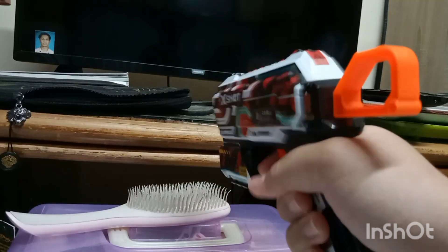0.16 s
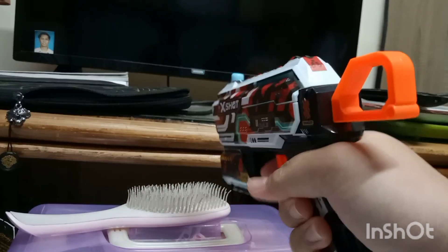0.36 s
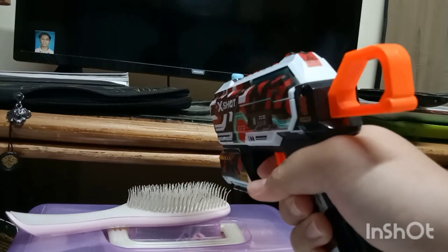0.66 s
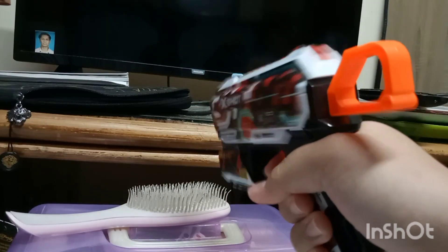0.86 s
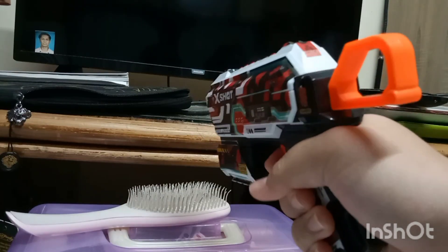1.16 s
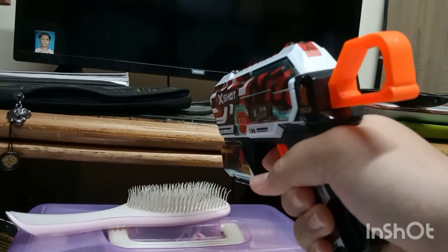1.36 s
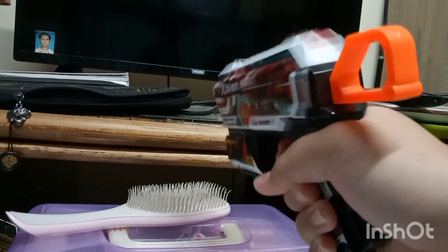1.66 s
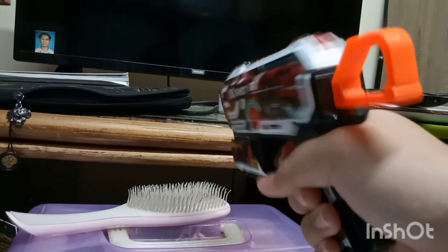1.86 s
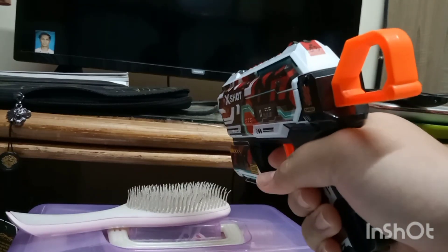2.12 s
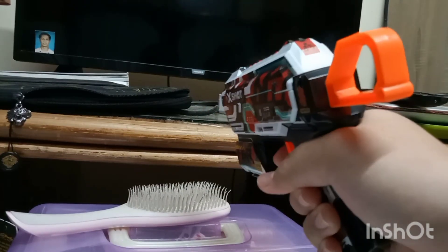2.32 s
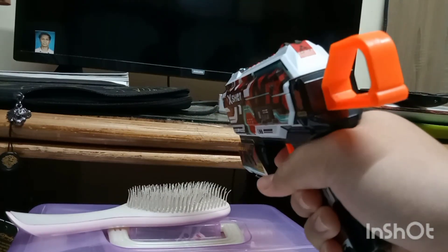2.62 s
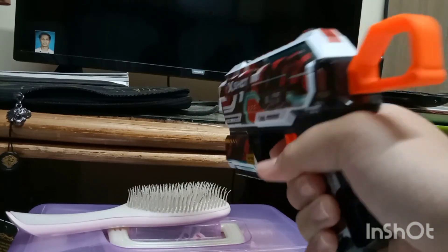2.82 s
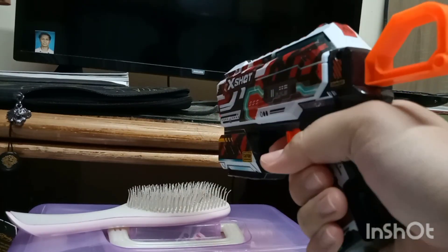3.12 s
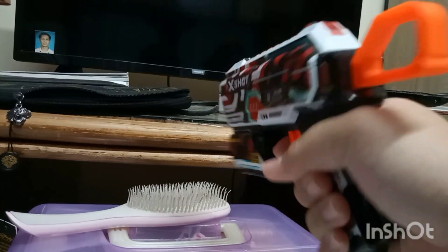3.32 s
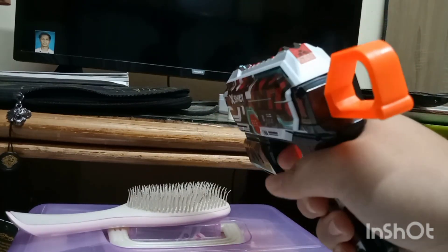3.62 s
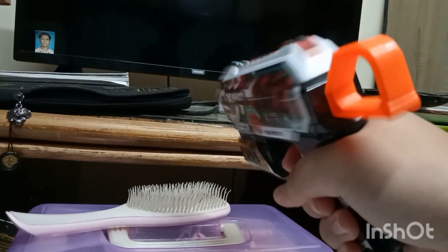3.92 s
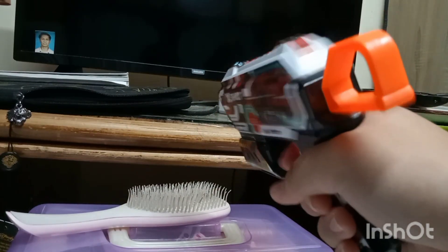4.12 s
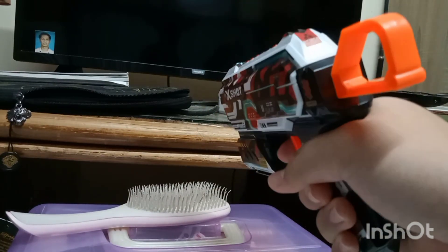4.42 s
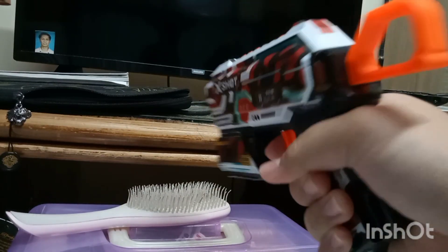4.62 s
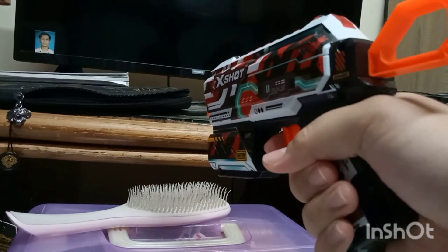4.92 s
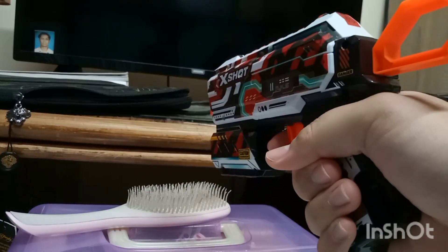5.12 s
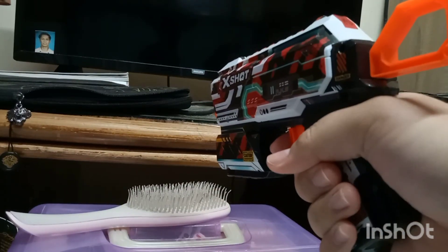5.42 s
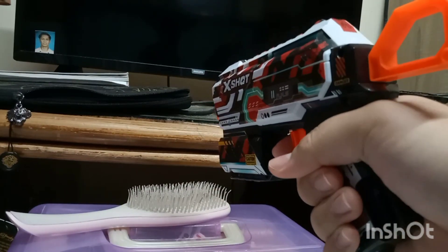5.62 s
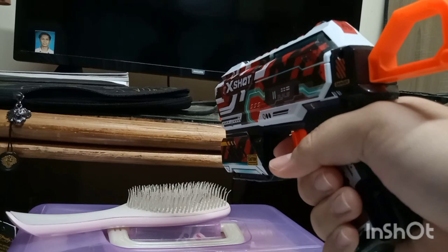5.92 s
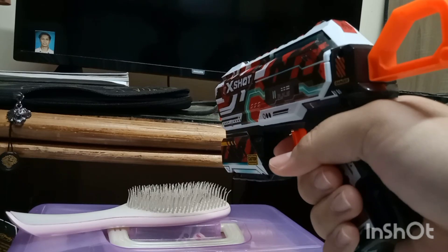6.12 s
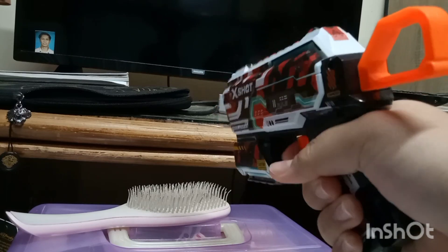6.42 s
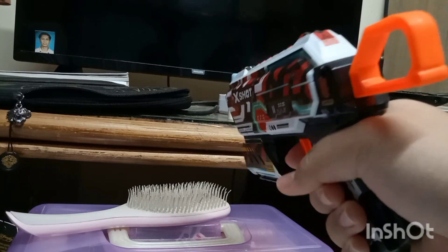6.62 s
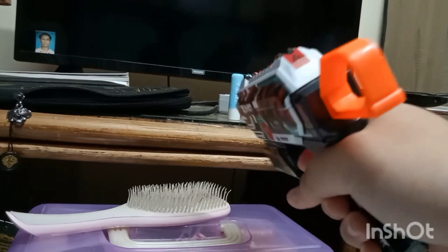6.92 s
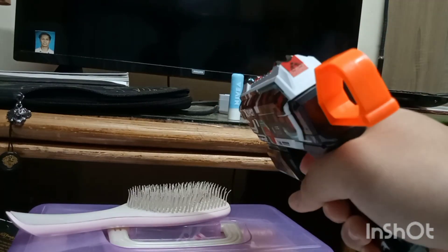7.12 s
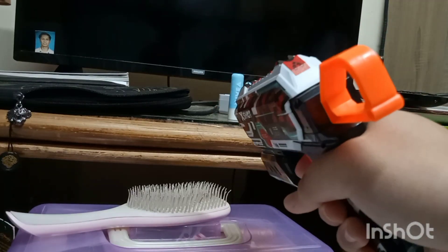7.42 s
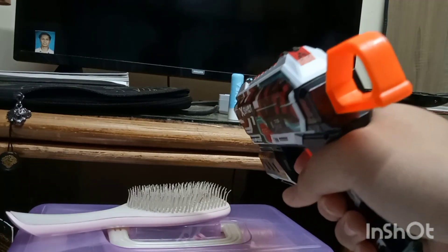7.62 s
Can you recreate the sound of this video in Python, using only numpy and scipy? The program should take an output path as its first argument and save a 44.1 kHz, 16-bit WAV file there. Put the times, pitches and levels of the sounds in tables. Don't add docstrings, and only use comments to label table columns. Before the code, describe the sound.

A hand works a hollow plastic toy blaster very close to a phone microphone in a small room. Six pulls come in pairs over the first two seconds, then a pause, four rapid pulls, a longer pause and one last pull. Each scrapes, clicks and slams, then the slide rubs back with ticks and a knock. Faint hum lies underneath.

```python
import sys
import numpy as np
from scipy import signal
from scipy.fft import rfft, irfft
from scipy.io import wavfile
from scipy.ndimage import uniform_filter1d

SR = 44100
rng = np.random.default_rng(int(sys.argv[2]) if len(sys.argv) > 2 else 0)


def put_to_file(sound):
    columns = np.atleast_2d(sound).T
    safe = np.clip(columns, -1, 1)
    whole_steps = np.round(safe * 32767)
    wavfile.write(sys.argv[1], SR, whole_steps.astype(np.int16))


def natural_amplitude(level_db):
    exponent = np.asarray(level_db, float) / 20
    return 10 ** exponent


N = 342216
LEAD = 4410

# frequency in Hz, level in dB per Hz.
WASH = [(15, -59), (30, -42), (60, -41), (87, -18.5), (124, -29.5), (182, -23.5), (252, -13.5), (290, -18),
        (600, -22), (750, -17.5), (1300, -19), (1700, -25.5), (1900, -38.5), (3400, -40), (4400, -46.5),
        (5270, -40), (6200, -47.5), (9000, -56), (16500, -55.5)]
# time in seconds, level in dB.
DRIFT = [(0, 0), (2.4, -0.5), (3.2, -1.5), (4.8, -1.5), (5.7, 2), (6.9, 0.5), (7.76, 4)]
# opening, sagging and shutting in seconds, lift in dB.
FLURRIES = [
    (-.5, 0.033, 0.69, 13.5),
    (0.215, 0.691, .76, 14.5),
    (0.901, 1.455, 1.8, 13),
    (1.7, 2.272, 2.29, 9),
    (3.524, 4.489, 4.67, 12),
    (6.352, 6.658, 6.7, 12.5),
]

# frequency in Hz, t60 in seconds.
ROOM = [(400, 0.23), (1000, 0.16), (2800, 0.15), (6000, .16), (9000, 0.145), (14000, 0.17)]
# delay in seconds, level in dB.
ECHOES = [(0.0126, -17), (0.0205, -24)]

# time in seconds, peak in dB, ring in Hz, room tail in dB.
FIDGETS = [
    (0.853, -52, 3710, -6),
    (4.468, -46, 3010, -8),
    (4.5265, -50, 3420, -9.5),
    (4.5978, -65, 2900, -9),
    (4.6218, -57, 3666, -13.5),
    (6.727, -67, 3200, -2),
    (0.877, -53.5, 5793, -2),
    (4.712, -72.5, 3300, -6.5),
]
# time in seconds, peak in dB, ring in Hz, room tail in dB.
PINCHES = [
    (1.517, -51, 6385, -10.5),
    (4.6205, -52.5, 6960, -9.5),
]
# frequency in Hz, level in dB per Hz.
FIDGET_COLOUR = [(470, -37.5), (800, -15.5), (1110, -2), (2350, -10.5), (3690, -4.5), (5300, -13),
                 (6890, -4.5), (7800, -17.5), (12000, -35.5), (15600, -63.5), (22000, -120)]
# frequency in Hz, level in dB per Hz.
PINCH_COLOUR = [(470, -43), (1100, -17), (2500, -25), (3700, -3), (5500, -27), (6600, 2), (7800, -3),
                (8500, -28), (16000, -54)]

# frequency in Hz, level in dB per Hz.
JOLT_COLOUR = [(15, -4.5), (40, -3.5), (100, 0), (160, 0.5), (230, -13), (400, -40)]
# start in seconds, pitch and width in Hz,
# level in dB, t60 in seconds.
LINGERING_TONES = [(0.072, 3142, 60.1, -71, 1.3), (0.771, 3200, 90.5, -74, .3), (1.125, 3700, 58.85, -23, .12),
                   (1.45, 3500, 400, -56, .36), (1.47, 1050, 150.7, -53.5, .25), (1.5, 1650, 200, -67.5, .3),
                   (4.715, 1450, 110, -64, .3), (4.515, 1500, 60, -60, .12), (6.405, 1335, 50, -21, .17),
                   (3.815, 1330, 30, -23, .2), (1.232, 1340, 40, -24, .14), (4.255, 1325, 50, -25, .15),
                   (0.855, 1080, 60, -57, .3), (4.63, 3200, 300, -78, .4), (0.09, 1620, 50, -72, .5),
                   (0.16, 1650, 50, -74, .5), (0.78, 1920, 60, -74, .4), (1.6, 1250, 200, -66, .3),
                   (1.655, 1600, 60, -66, .2), (1.53, 5300, 80, -68, .12), (4.6, 1200, 400, -64, .25),
                   (3.245, 900, 80, -67, .15), (6.73, 4700, 300, -74, .2)]
# frequency in Hz, level in dB, t60 in seconds.
RATTLE = [(567.5, -30, 0.11), (675, -35, 0.18), (785, -24.5, 0.16), (872, -26.5, 0.22), (950, -22, 0.17),
          (1006, -25, 0.17), (1079, -25, .15), (1182, -25, 0.15), (1216, -27.5, 0.2), (1286, -28, 0.13),
          (1312, -23, 0.18), (1412, -26.5, 0.18), (1694, -29.5, .18), (1714, -25, .16),
          (1806, -35, .12), (1930, -36, .09), (2018, -33, .1), (2590, -35, .06), (3050, -35, .06),
          (3200, -37, .07), (3520, -37, .05), (3737, -38, .07)]
# end and length in seconds, start and slowest level in dB.
RUBS = [(0.413, 0.063, -24.5, -40.5), (0.629, 0.061, -26.5, -33.5), (1.103, 0.072, -26.5, -46),
        (1.346, 0.061, -28.5, -44), (1.873, 0.036, -31.5, -38), (2.087, 0.057, -28, -32.5),
        (3.689, 0.045, -30, -42), (3.91, .051, -29.5, -32.5), (4.143, 0.052, -27, -41),
        (4.358, .047, -28, -34.5), (6.537, 0.078, -28, -45)]

# time in seconds, peak in dB, ring in Hz, room tail in dB under the knock.
TICKS = [(0.397, -19.5, 3100, -13.5), (0.4118, -7, 6147, -13.5), (0.633, -5, 5350, -12.5),
         (1.0877, -20.5, 3428, -8), (1.1049, -5.5, 5780, -13), (1.3327, -17.5, 6153, -12.5),
         (1.3454, -7, 6270, -8.5), (1.8561, -14.5, 3298, -13), (1.8709, -6.5, 5850, -9),
         (2.0758, -16, 2855, -15.5), (2.0905, -4.5, 5348, -9), (3.692, -13, 5478, -6.5),
         (3.708, -2, 5837, -6), (3.913, -4.5, 5476, -7.5), (4.13, -17, 3146, -8), (4.145, -6.5, 5735, -7),
         (4.361, -6.5, 5552, -3.5), (6.5171, -25, 3062, -24.5), (6.5365, -7, 3030, -7)]
# time in seconds, peak in dB, ring in Hz, room tail in dB.
GRAZES = [
    (0.629, -13, 5400, -12),
    (1.103, -14, 3518, -11.5),
    (2.0892, -11, 5267, -12.5),
    (3.705, -17.5, 3004, -9),
    (4.358, -10, 5786, -12.5),
    (6.5335, -12.5, 3029, -12),
    (1.883, -5, 5958, -20),
]
# time in seconds, peak in dB, ring in Hz, room tail in dB.
RETURNS = [(0.427, -1.5, 5700, -6), (0.648, 1.5, 5304, -10), (1.123, -1.5, 3640, -7.5),
           (1.363, 0.5, 6130, -9.5), (1.8862, 0, 6355, -9.5), (2.104, 0, 5688, -9.5),
           (3.7227, -2.5, 2530, -8), (3.927, -2, 5483, -7), (4.160, -3, 5640, -6.5), (4.375, -1, 5550, -8),
           (6.559, -1, 5660, -10)]
# time in seconds, peak in dB, ring in Hz, room tail in dB.
EARLIER = [
    (-0.024, -4.5, 3700, -6.5),
]
# frequency in Hz, level in dB per Hz.
TICK_COLOUR = [(180, -56.5), (300, -53.5), (650, -25), (1000, 2.5), (1660, -12), (2170, -3.5), (2890, -1.5),
               (4170, -6), (5370, 2), (11000, -14.5), (14900, -11), (15700, -19), (16500, -40)]
# frequency in Hz, level in dB per Hz.
RETURN_COLOUR = [(180, -55), (300, -41.5), (620, -20), (954, -2.5), (2840, -7.5), (4460, -7), (5370, -2),
                 (6240, -3), (6900, -6.5), (9650, -14.5), (11000, -18), (15400, -18.5), (15900, -50)]

# time in seconds, peak in dB, ring in Hz, room tail in dB.
CATCHES = [(0.235, -15, 4965, -7), (0.469, 0, 5272, -26), (0.901, -11, 3146, -10),
           (1.177, -3.5, 3200, -18.5), (1.706, -5.5, 6240, -16.5), (1.938, -6, 6300, -16),
           (3.535, -7, 5460, -13.5), (3.756, -4, 5402, -26.5), (3.98, -2, 5140, -14),
           (4.196, -3.5, 4837, -44.5), (6.35, -7.5, 3383, -16.5)]
# time in seconds, peak in dB, ring in Hz, room tail in dB.
SCRAPES = [
    (0.462, -16, 5190, -31.5),
    (1.170, -11.5, 1037, -23.5),
    (1.699, -17, 5130, -25),
    (1.934, -14, 5487, -24),
    (3.750, -11, 3213, -25.5),
    (3.974, -12.5, 5160, -26),
    (4.190, -14.5, 5100, -30.5),
]
# time in seconds, peak in dB, ring in Hz, room tail in dB.
SNAPS = [
    (0.2355, -15.5, 4835, -29.5),
    (1.179, -7, 3200, -29),
    (1.9385, 0, 6332, -31),
    (3.757, -5.5, 3140, -30),
]
# time in seconds, peak in dB, ring in Hz, room tail in dB.
NUDGES = [(0.26, -31, 959, -4), (0.491, -22.5, 1107, -1.5), (0.933, -24, 989, -6.5), (1.194, -22.5, 952, 1),
          (1.727, -30.5, 1367, 4.5), (1.956, -25, 973.4, 2), (3.556, -20.5, 1006, -1.5),
          (3.779, -20, 922.4, -3.5), (3.999, -15.5, 954, -11), (4.216, -20, 970, -1),
          (6.367, -26, 940.5, 0)]
# time in seconds, peak in dB, ring in Hz, room tail in dB.
LATCHES = [(0.2815, -3.5, 6018, -13), (0.5027, -1, 5980, -13), (0.9571, 0.4, 3197, -11.5),
           (1.2066, -1.7, 5950, -13.5), (1.7438, -2, 5887, -14), (1.9678, -0.5, 5923, -14.5),
           (3.5684, -2.5, 3516, -14), (3.7898, -4.5, 3546, -16), (4.0148, 2, 3526, -19.5),
           (4.2298, -4.5, 5834, -17), (6.3809, -0.06, 6080, -15)]
# time in seconds, peak in dB, ring in Hz, room tail in dB.
SLAMS = [(0.299, -1.95, 1070, -3), (0.522, -1.3, 1005, -3.5), (0.975, -2.25, 1037, -4),
         (1.227, 0.45, 1071, -7.5), (1.763, -0.23, 1020, -5), (1.987, -4, 979.6, -3),
         (3.588, -0.5, 1019, -7.5), (3.809, 0.44, 1059, -6), (4.033, -3, 1144, -4.5),
         (4.2489, -0.5, 1208, -8), (6.401, -0.2, 1172, -7.5)]
# frequency in Hz, level in dB per Hz.
CATCH_COLOUR = [(180, -57.5), (300, -39.5), (620, -27), (880, -3), (1690, -5.5), (2890, 2), (4170, -1),
                (6340, 5.5), (8870, -6.5), (9810, -7), (11400, -14.5), (15200, -9), (16500, -27.5)]
# frequency in Hz, level in dB per Hz.
NUDGE_COLOUR = [(180, -58), (500, -32.5), (800, -2), (1100, 1.5), (1500, -4), (3000, -31), (6000, -29.5),
                (16500, -55)]
# frequency in Hz, level in dB per Hz.
LATCH_COLOUR = [(180, -64.5), (300, -41.5), (1020, -16), (2700, -14.5), (3530, -5.5), (4460, -13),
                (5930, 0), (6900, -15), (9980, -17), (11200, -24.5), (14900, -24.5), (16500, -29)]
# frequency in Hz, level in dB per Hz.
SLAM_COLOUR = [(180, -57.5), (330, -38), (600, -23), (800, -7.5), (1130, -6), (2000, -5.5), (2900, -4.5),
               (4000, -9), (6100, -0.5), (7200, -12.5), (9500, -13.5), (12000, -25), (15400, -24),
               (15900, -50)]
# frequency in Hz, level in dB per Hz.
SLAM_TAIL = [(180, -68.5), (330, -44.5), (560, -17.5), (760, -17), (920, -8.5), (1050, -9), (1350, -7),
             (1520, -10), (2300, -16), (2800, -16.5), (4030, -18), (5900, -13.5), (8500, -23.5),
             (16500, -31.5)]
# frequency in Hz, level in dB, t60 in seconds.
SHELL = [(884, -8, 0.16), (1020, 8.5, .024), (1125.4, 0, 0.052), (1244, -10.5, 0.67)]
# frequency in Hz, level in dB, t60 in seconds.
WALLS = [(1060, -6, .025), (2050, -9, .016), (2350, -8, .014), (3120, -6, .016), (3720, -7, .016),
         (4900, -6, .014), (5500, -2, .014), (6200, -3, .014)]

# frequency in Hz, gain in dB.
MICROPHONE = [(300, -0.5), (600, -0.06), (1500, -2), (3000, 2.5), (4000, 0.5), (6350, 1), (6650, -4),
              (7700, -1.5), (8000, 0.36), (10650, 0.45), (10950, -5.5), (13500, -4), (15500, 3),
              (15850, -9), (16650, -14), (16950, -70)]
# lower and upper edge in Hz, spread in dB.
PATCHY = [(1800, 3300, 1.5), (3300, 4800, 1.5), (4800, 6500, 1.5), (6700, 7700, 5), (7900, 10600, 2),
          (10900, 12400, 4), (12400, 14000, 4.5), (14000, 16800, 4)]


def evened(x):
    return x / np.sqrt(np.mean(x ** 2) + 1e-20)


def smooth_noise(count, size):
    return evened(uniform_filter1d(rng.standard_normal(count), size=size))


def read(points, hz):
    f, value = np.transpose(points)
    return np.interp(np.log(hz + 1), np.log(f + 1), value)


def causal(spectrum, size=2048):
    log_gain = np.log(natural_amplitude(read(spectrum, abs(np.fft.fftfreq(size, 1 / SR)))))
    phase = -signal.hilbert(log_gain).imag
    return np.fft.ifft(np.exp(log_gain + 1j * phase)).real[:size // 2]


def band(x, lo_hz, hi_hz):
    return signal.sosfilt(signal.butter(2, [lo_hz, hi_hz], "bandpass", fs=SR, output="sos"), x)


def capped(x):
    below = np.clip((15750 - np.fft.rfftfreq(len(x), 1 / SR)) / 350, 0, 1)
    return irfft(rfft(x) * np.sin(np.pi / 2 * below) ** 2, len(x))


def easing(t):
    lifts = []
    for opens, sags, shuts, lift_db in FLURRIES:
        opening = 1 - np.exp(-np.maximum(t - opens, 0) / 0.12)
        lifts.append(lift_db * opening * np.where(t < sags, 1, 0.31) * (t < shuts))
    return uniform_filter1d(np.max(lifts, axis=0), round(0.03 * SR)) + np.interp(t, *np.transpose(DRIFT))


def wash():
    hz, frames = np.fft.rfftfreq(1024, 1 / SR), N // 256 + 5
    re, im, patches, flecks = rng.standard_normal((frames, 513, 4)).T
    flecks = np.maximum(evened(uniform_filter1d(flecks, size=6, axis=1)) - 1.2, 0)
    waver = evened(uniform_filter1d(uniform_filter1d(patches, size=25, axis=0), size=50, axis=1))
    patches = evened(uniform_filter1d(uniform_filter1d(patches, size=4, axis=0), size=12, axis=1))
    level_db = read(WASH, hz)[:, None] + 2.3 * patches + 0.5 * waver + 7 * flecks
    noise = signal.istft((re + 1j * im) * natural_amplitude(level_db), nperseg=1024, noverlap=768)[1][:N]
    return noise / np.std(band(noise, 170, 16000)) * natural_amplitude(-70.5)


def background():
    t = np.arange(N) / SR
    open_db = easing(t)
    duck_db = np.zeros(N)
    for s, *_ in SLAMS:
        age = np.maximum(t - s, 0)
        duck_db += 14 * (1 - np.exp(-age / .006)) * np.exp(-age / .06)
    a, b, c = rng.standard_normal((3, N))

    hum_hz = 247.8
    hum = 1.35 * np.sin(2 * np.pi * hum_hz * t) + 0.44 * evened(band(a, hum_hz - 9, hum_hz + 9))
    hum *= natural_amplitude(-65.5 + open_db - duck_db)

    throb = 1.15 * np.sin(2 * np.pi * 95.4 * t) + 0.35 * evened(band(b, 80, 115))
    beat = 1 + 0.85 * np.cos(2 * np.pi * 4.49 * (t - 5.09))
    swell_db = 3 * np.cos(2 * np.pi * 0.97 * (t - 5.22))
    throb *= natural_amplitude(-71.5 + swell_db + 0.72 * open_db) * beat / 2

    rumble = natural_amplitude(-75 + open_db) * evened(band(c, 150, 220))
    lifted = natural_amplitude(.6 * (uniform_filter1d(open_db, size=3000) - np.median(open_db)))
    return hum + throb + rumble + wash() * lifted


def room(x):
    out, t = np.zeros(len(x)), np.arange(len(x)) / SR
    for k in range(3):
        hz, s, z = signal.stft(rng.standard_normal(SR // 2), SR, nperseg=256)
        z = z * natural_amplitude(-60 * s / read(ROOM, hz)[:, None])
        tail = signal.istft(z, SR, nperseg=256)[1]
        age = np.arange(len(tail)) / SR
        tail = tail * natural_amplitude(2.6 * smooth_noise(len(tail), 70))
        early = sum(natural_amplitude(db) * np.exp(-((age - delay) / 0.00063) ** 2) for delay, db in ECHOES)
        tail = tail * (np.clip(age / .009 - .4, 0, 1) + early)
        turn = np.cos(2 * np.pi * 1.7 * t + k * np.pi / 3)
        out += signal.fftconvolve(x * turn, tail / np.linalg.norm(tail))[:len(x)]
    return out


def jolts():
    t = np.arange(N) / SR
    shape = sum(natural_amplitude(-60 * np.maximum(t - s, 0) / 0.12) * (t > s) for s, *_ in SLAMS + RETURNS)
    low = irfft(rfft(rng.standard_normal(N)) * natural_amplitude(read(JOLT_COLOUR, np.fft.rfftfreq(N, 1 / SR))), N)
    return natural_amplitude(-59.5) * uniform_filter1d(shape, size=400) * evened(low)


def lingering_tones():
    out, age = np.zeros(N), np.arange(SR) / SR
    for s, hz, width, db, t60 in LINGERING_TONES:
        rise_s = .021 / natural_amplitude(.35 * (db + 63.5))
        ring = band(rng.standard_normal(SR), hz - width / 2, hz + width / 2)
        ring = ring / np.sqrt(abs(uniform_filter1d(ring ** 2, size=1800)) + 1e-9)
        part = out[round(s * SR):][:SR]
        part += (natural_amplitude(db - 60 * age / t60) * np.minimum(age / rise_s, 1) * ring)[:len(part)]
    return out


def panels():
    out, t = np.zeros(N), np.arange(SR // 5) / SR
    hz, db, t60 = np.transpose(RATTLE)[:, :, None]
    start = rng.random(hz.shape)
    for s, peak_db, _, tail_db in SLAMS:
        a, b, c = rng.standard_normal((3, *hz.shape))
        wobble = 1 + .45 * np.sin(2 * np.pi * (rng.uniform(14, 40, hz.shape) * t + start * 7))
        tones = np.sin(2 * np.pi * (hz * (1 + .002 * b) * t + start + .08 * c))
        rings = (wobble * natural_amplitude(db + 2.5 * a - 60 * t / t60) * tones).sum(axis=0)
        out[round(s * SR):][:len(t)] += natural_amplitude(.6 * (peak_db + tail_db + 4.5)) * rings * np.minimum(t / .011, 1) ** 2
    return natural_amplitude(8.5) * out


def rub():
    out = np.zeros(N)
    for end, length, start_db, slowest_db in RUBS:
        s = [end - length, end - 0.67 * length, end - 0.0029, end]
        db = [start_db, slowest_db, -36.5, -27.5]
        t = np.arange(s[0] - .02, s[-1] + 0.0054, 1 / SR)
        grit = rng.standard_normal(len(t)) * natural_amplitude(0.98 * smooth_noise(len(t), 60))
        grit = signal.fftconvolve(grit, causal(TICK_COLOUR))[:len(t)]
        fade = np.minimum((t - t[0]) / 0.0091, 1)
        out[round(t[0] * SR):][:len(t)] += natural_amplitude(np.interp(t, s, db) - 1.5) * fade * evened(grit)
    return out


def shell_ring(hz, age):
    out = np.zeros(len(age))
    for f, db, t60 in SHELL:
        pitch = f * (hz / 1030) ** 0.58 * (1 + 0.017 * rng.standard_normal())
        out += natural_amplitude(db - 60 * age / t60) * np.sin(2 * np.pi * pitch * age)
    return band(out * np.minimum(age / .0009, 1), 760, 1600)


def wall_ring(grit, age):
    response = np.zeros(len(age))
    for f, db, t60 in WALLS:
        a, b = rng.standard_normal(2)
        response += natural_amplitude(db + 4 * a - 60 * age / t60) * np.sin(2 * np.pi * f * (1 + .015 * b) * age)
    return band(band(signal.fftconvolve(grit, response)[:len(grit)], 750, 9000), 750, 9000)


def knocks(rows, colour, tail_colour, trim_db, rise, fall_ms, flat, lead_db, shell_db=-60, ping_db=-10.0,
           wall_db=-14.0, lead_ms=5.4, sudden=1, trail_db=-40, trail_ms=6.0):
    out, taps, puff = np.zeros((2, N + 2 * LEAD)), causal(colour), causal(tail_colour)
    ms = np.arange(-441, 1764) * 1000 / SR
    after = np.maximum(ms, 0) / 1000
    past = np.maximum(ms - rise, 0)
    shape = np.clip(ms / max(rise, .1), 0, 1) * np.exp(-(past / fall_ms) ** flat)
    shape += natural_amplitude(lead_db) * np.clip(sudden * (1 + ms / lead_ms), 0, 1) * (ms < rise)
    shape += natural_amplitude(trail_db) * (ms >= rise) * np.exp(-past / trail_ms)
    for s, peak_db, hz, tail_db in rows:
        uneven = natural_amplitude(1.6 * smooth_noise(len(ms), 24))
        grit = shape * rng.standard_normal(len(ms)) * uneven
        knock = evened(signal.fftconvolve(grit, taps)[:len(ms)])
        knock += natural_amplitude(wall_db) * evened(wall_ring(grit, after[441:]))
        knock += natural_amplitude(ping_db) * evened(band(grit, hz * .95, hz * 1.05))
        knock += natural_amplitude(shell_db) * evened(shell_ring(hz, after))
        knock *= natural_amplitude(peak_db + trim_db) / abs(knock).max()
        at = round((s - .0005) * SR) + LEAD
        out[0, at - 441:at + 1764] += knock
        out[1, at:at + len(puff)] += natural_amplitude(tail_db) * np.linalg.norm(knock) * puff / np.linalg.norm(puff)
    return out


def fingers():
    shifts = knocks(FIDGETS, FIDGET_COLOUR, FIDGET_COLOUR, trim_db=1.0, rise=1.1, fall_ms=3.7, flat=1.2,
                    lead_db=-19.5, wall_db=-4.5)
    return shifts + knocks(PINCHES, PINCH_COLOUR, PINCH_COLOUR, trim_db=0.5, rise=1.2, fall_ms=7.2, flat=1.2,
                           lead_db=-12, wall_db=-40)


def release():
    ticks = knocks(TICKS, TICK_COLOUR, TICK_COLOUR, trim_db=-5.0, rise=1.0, fall_ms=5.7, flat=4.3, lead_db=-24.5)
    grazes = knocks(GRAZES, TICK_COLOUR, TICK_COLOUR, trim_db=-4.0, rise=.6, fall_ms=1.8, flat=3.0, lead_db=-30)
    home = knocks(RETURNS + EARLIER, RETURN_COLOUR, RETURN_COLOUR, trim_db=-2.0, rise=.4, fall_ms=3.3, flat=3,
                  lead_db=-7, lead_ms=2.8, sudden=3, trail_db=-7, trail_ms=9.0)
    return ticks + grazes + home


def catch():
    over = knocks(CATCHES, CATCH_COLOUR, CATCH_COLOUR, trim_db=-4.5, rise=0.96, fall_ms=8.1, flat=2.1,
                  lead_db=-11.0, wall_db=-9.0)
    drag = knocks(SCRAPES, CATCH_COLOUR, CATCH_COLOUR, trim_db=-3.5, rise=2.5, fall_ms=22.0, flat=3.3,
                  lead_db=-25, wall_db=-7.0)
    snap = knocks(SNAPS, CATCH_COLOUR, CATCH_COLOUR, trim_db=0.0, rise=.8, fall_ms=1.3, flat=1.5, lead_db=-30)
    nudge = knocks(NUDGES, NUDGE_COLOUR, NUDGE_COLOUR, trim_db=0.0, rise=0.91, fall_ms=0.56, flat=0.96,
                   lead_db=-9.5, ping_db=-3.5, wall_db=-40.5)
    return over + drag + snap + nudge


def latch():
    return knocks(LATCHES, LATCH_COLOUR, LATCH_COLOUR, trim_db=-2, rise=0.99, fall_ms=2.4, flat=1.3,
                  lead_db=-34.0, wall_db=-16.5, trail_db=-18, trail_ms=6.1)


def slam():
    out = knocks(SLAMS, SLAM_COLOUR, SLAM_TAIL, trim_db=2.0, rise=0.97, fall_ms=12.0, flat=0.99, lead_db=-40.0,
                 shell_db=5.5, ping_db=-8, wall_db=-15.0, trail_db=-9, trail_ms=8.0)
    out[0] += natural_amplitude(-17) * np.roll(band(out[0], 800, 1300), round(.0495 * SR))
    return out


def scene():
    around = background() + jolts() + lingering_tones() + panels() + capped(rub())
    direct, to_room = fingers() + release() + catch() + latch() + slam()
    toy = direct + natural_amplitude(3.5) * capped(room(to_room))
    return (around + toy[LEAD:LEAD + N])[None]


def gain_dips():
    dip_db, age = np.zeros(N), np.maximum(np.arange(SR // 2) / SR - .004, 0)
    dip = (1 - np.exp(-age / .003)) * np.exp(-age / .035)
    for rows, depth_db in [(CATCHES, 5), (LATCHES, 0.5), (SLAMS, 14.5), (TICKS, -0.5), (RETURNS, 2)]:
        for s, *_ in rows:
            dip_db[round(s * SR):][:SR // 2] += depth_db * dip
    return dip_db


def patched(x):
    hz, s, z = signal.stft(x, SR, nperseg=256)
    for lo_hz, hi_hz, db in PATCHY:
        blocks = np.repeat(rng.standard_normal(len(s) // 5 + 1), 5)[:len(s)]
        z[:, (hz >= lo_hz) & (hz < hi_hz)] *= natural_amplitude(db * np.clip(blocks, -2, 1))
    return signal.istft(z, SR, nperseg=256)[1][:, :N]


def top_shut(x):
    top = signal.sosfiltfilt(signal.butter(6, 8000, "highpass", fs=SR, output="sos"), x)
    near = uniform_filter1d(x ** 2, size=900) / natural_amplitude(2 * -56)
    return x - top * (near < 1) * (near > natural_amplitude(-30)) * (1 - np.sqrt(abs(near)))


def top_cut(x):
    return signal.sosfilt(signal.butter(12, 16810, fs=SR, output="sos"), x)


def record(dry):
    bass = signal.sosfiltfilt(signal.butter(4, 330, fs=SR, output="sos"), dry)
    rest = signal.oaconvolve(dry - bass, causal(MICROPHONE)[None])[:, :N] / natural_amplitude(gain_dips())
    rest = top_shut(patched(rest))
    return top_cut(np.clip(bass + rest, -.93, .93))


dry = scene()
out = record(dry)
put_to_file(out)
```